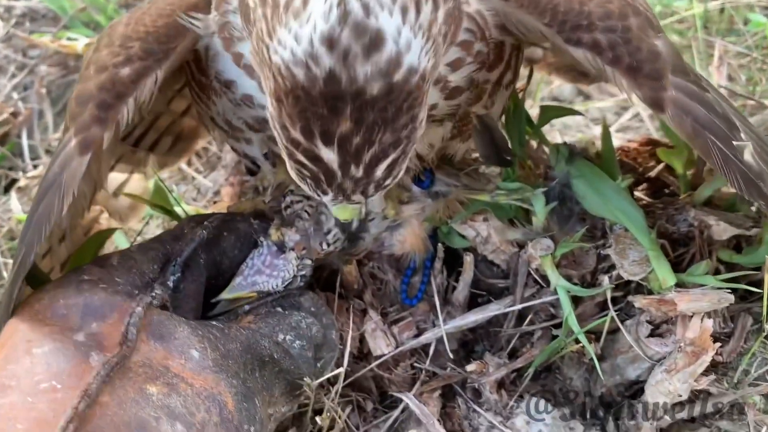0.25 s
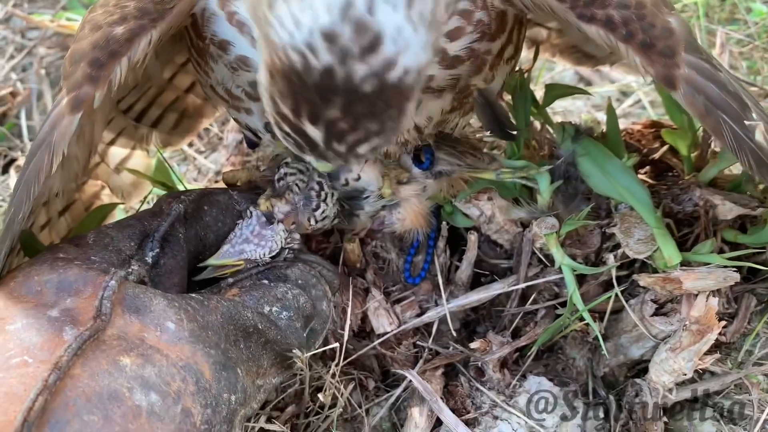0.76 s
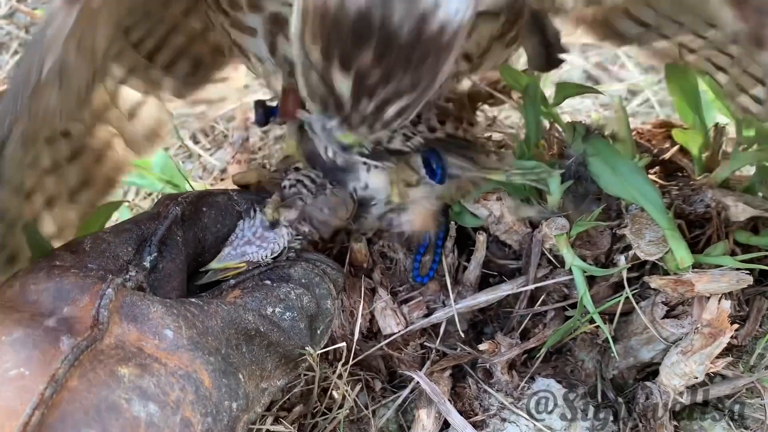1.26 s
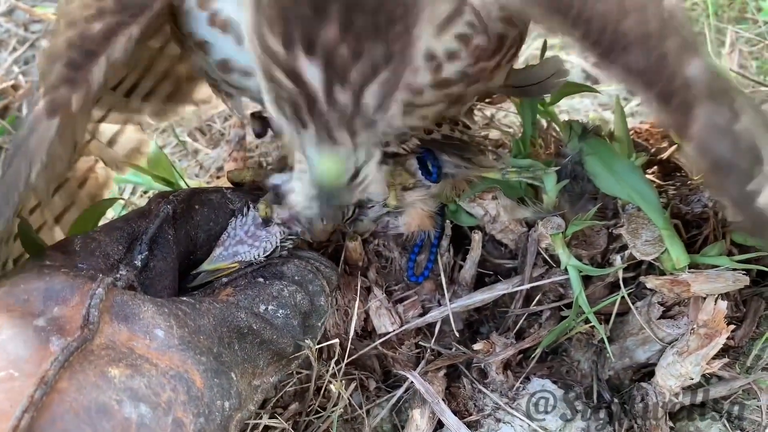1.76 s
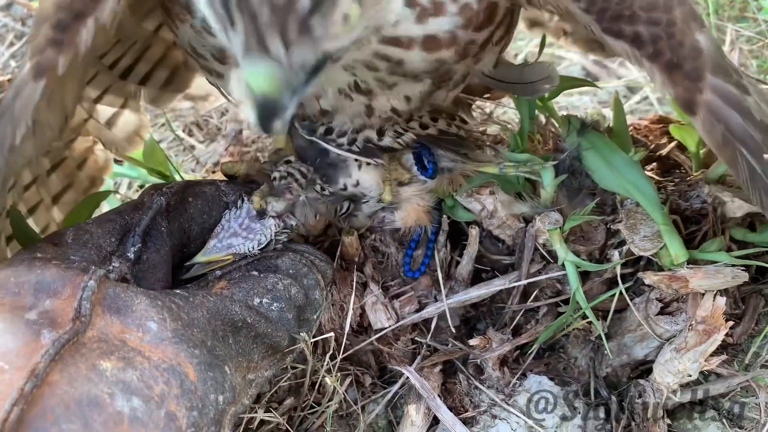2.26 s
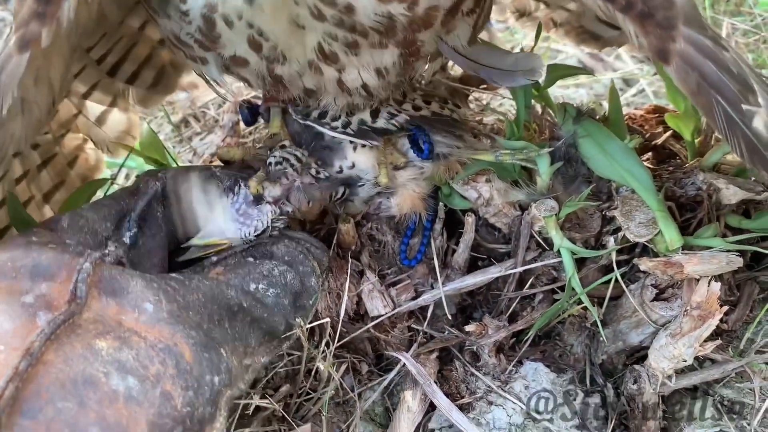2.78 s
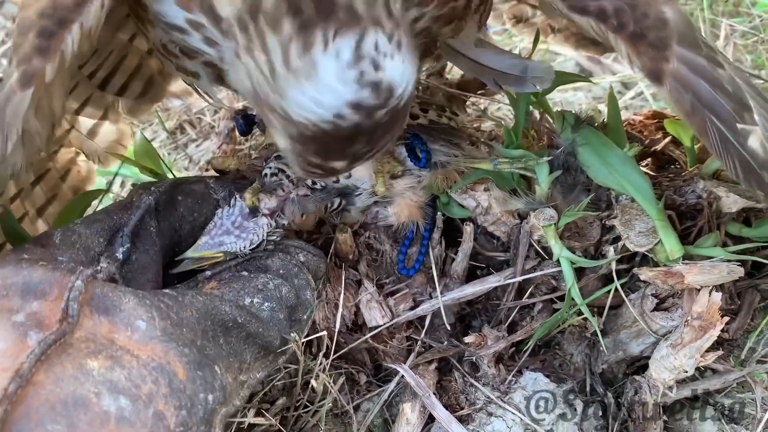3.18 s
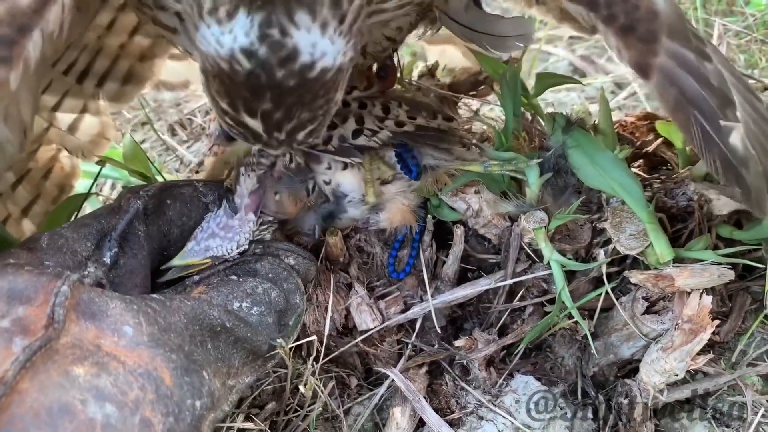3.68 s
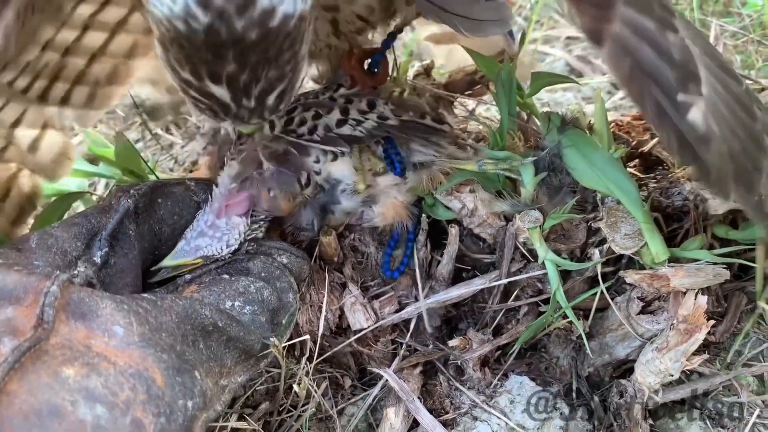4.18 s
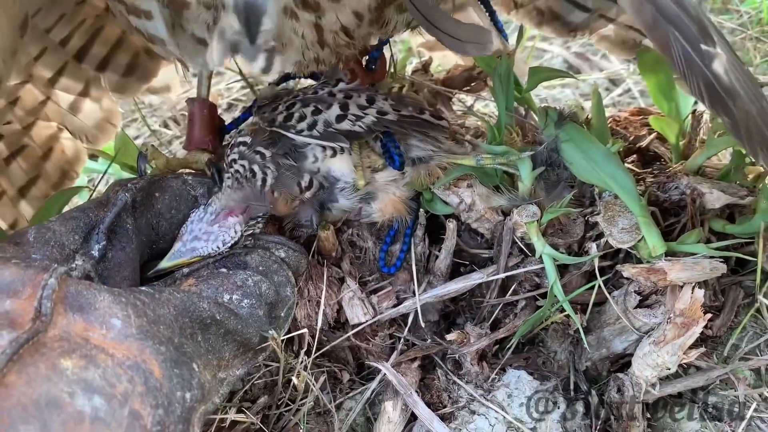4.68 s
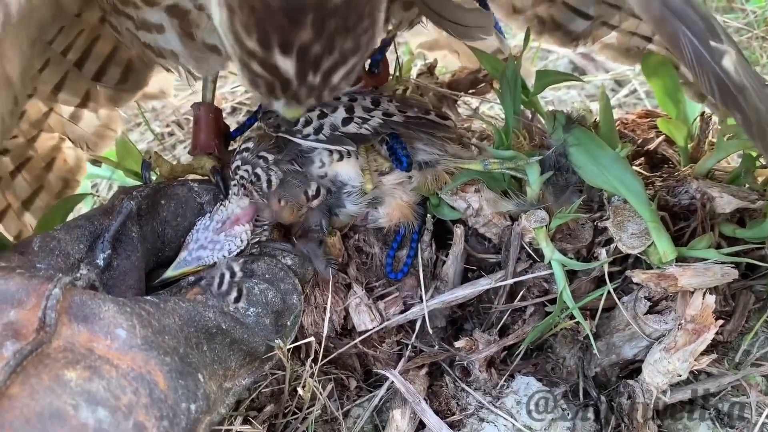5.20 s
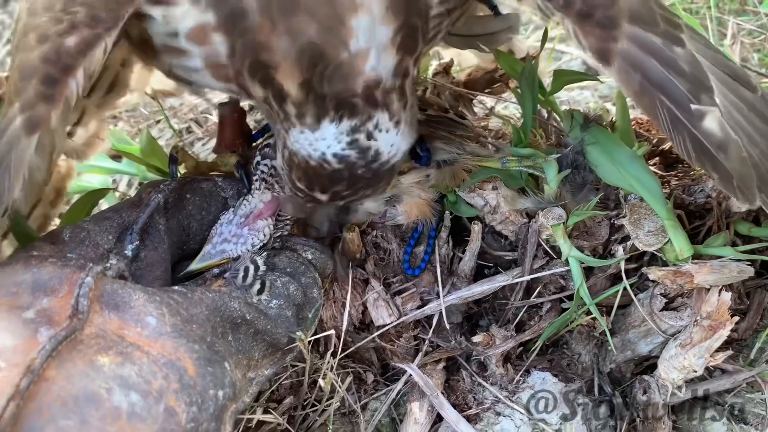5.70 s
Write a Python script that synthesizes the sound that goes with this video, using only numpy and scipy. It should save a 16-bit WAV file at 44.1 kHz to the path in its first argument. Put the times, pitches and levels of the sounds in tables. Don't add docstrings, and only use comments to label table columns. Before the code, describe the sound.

Outdoors among trees, a phone held an arm's length from a feeding hawk hears a low, steady rumble of far traffic with light air hiss and a very high insect shimmer that thins out mid-way. From 0 to 1.4 s there are faint twig snaps, dry leaf ticks and brushing swishes, with a sharper snap and small dull thud at 0.6 s. Tiny far songbird whistles appear at the start and around 2 to 2.8 s. Hollow little beak-on-bone knocks cluster from 2.5 to 3.4 s. Brisk cracks and leaf drags stand out at 3.9 to 4.3 s, then it nearly stills, a faint high katydid pulsing rapidly. At 5.0 s comes one loud, piercing call, about a quarter second long, leaping up then sliding down, slightly rough at its end, with a thin answer from the trunks. Traffic swells slightly and faint rustles return near 5.7 s.

```python
import sys
import numpy as np
from scipy import signal
from scipy.fft import rfft, irfft
from scipy.io import wavfile
from scipy.ndimage import uniform_filter1d

SR = 44100
rng = np.random.default_rng(int(sys.argv[2]) if len(sys.argv) > 2 else 0)


def ratio_of_db(decibels):
    return 10 ** (np.asarray(decibels, float) / 20)


def persist_wave(psi):
    counts = np.round(np.clip(psi, -1, 1) * 32767).astype(np.int16)
    wavfile.write(sys.argv[1], SR, np.atleast_2d(counts).T)


N = 262262
TIME = np.arange(N) / SR
HZ = np.arange(N // 2 + 1) * SR / N + 1e-6


def curves(rows, smooth=1):
    s, *columns = np.transpose(rows)
    lines = [np.interp(TIME, s, column) for column in columns]
    return [uniform_filter1d(uniform_filter1d(line, smooth), smooth) for line in lines]


def on_log(rows):
    hz, db = np.transpose(rows)
    return np.interp(np.log(HZ), np.log(hz), db)


def level(x, db):
    return x * ratio_of_db(db) / np.sqrt(np.mean(x ** 2))


def band(x, lo_hz, hi_hz):
    return signal.sosfilt(signal.butter(2, [lo_hz, hi_hz], "band", fs=SR, output="sos"), x)


def walk(rate):
    k = int(SR / rate)
    held = np.repeat(rng.standard_normal(N // k + 1), k)
    return 1.4 * uniform_filter1d(uniform_filter1d(held, k), k)[:N]


def bump(x, centre, width, db):
    return db / (1 + (2 * (x - centre) / width) ** 2)


def ports(x, pan_db):
    # frequency in Hz, left port's lead in radians.
    port_lead = [(0, 0.5), (1400, 1.11), (2000, 0.7), (2200, 0.4), (2300, 1.3), (2450, 0.5), (3200, 1.5),
                 (4200, 2.1), (4900, 3.49), (6200, 5.9), (7400, 7.5), (9800, 10.9), (12300, 15),
                 (16000, 20.0)]
    half_lead = np.interp(HZ, *np.transpose(port_lead)) / 2
    power_ratio = ratio_of_db(pan_db) ** 2
    left = np.sqrt(power_ratio) * np.exp(1j * half_lead)
    right = np.exp(-1j * half_lead)
    gains = np.sqrt(2 / (1 + power_ratio)) * np.array([left, right])
    return irfft(rfft(x) * gains, N)


def diffuse(colour):
    # frequency in Hz, side minus mid in dB.
    side_spread = [(60, -24.5), (110, -20.5), (200, -16), (380, -5.5), (700, 3.5), (1290, 2), (2380, 2.5),
                   (4400, 6), (8120, -0.5), (15000, -3)]
    spread = np.array([np.ones_like(HZ), ratio_of_db(on_log(side_spread))])
    noise = irfft(rfft(rng.standard_normal((2, N))) * spread * colour, N)
    return noise / noise[0].std()


def traffic():
    # frequency in Hz, density in dB per Hz.
    rumble_tone = [(15, -53.5), (25, -21), (62, -6), (80, -1), (97, -1.5), (135, -6), (160, -5.5),
                   (259, -23.5), (279, -15.5), (333, -25.5), (409, -42), (441, -41.5), (520, -38.5),
                   (680, -72), (1140, -120)]
    # centre in Hz, width in Hz, level in dB.
    engines = [(62.6, 11, -70.5), (84.8, 6, -76), (122.3, 3.9, -69.5), (148.06, 3.5, -72),
               (242.6, 6, -78.5)]
    # time in seconds, width in seconds, swell in dB.
    cars = [
        (0, 2.4, 9.5),
        (4.1, 1.3, 8.5),
        (5.65, 1.1, 12),
    ]
    rumble = diffuse(ratio_of_db(on_log(rumble_tone))) * ratio_of_db(-63 + 0.79 * walk(1.2))
    for hz, width_hz, db in engines:
        rumble[0] += level(band(rng.standard_normal(N), hz - width_hz / 2, hz + width_hz / 2), db)
    road = band(band(rng.standard_normal(N), 330, 470), 330, 470)
    road_db = -100 + sum(bump(TIME, *car) for car in cars) + 2.5 * walk(6)
    rumble[0] += ratio_of_db(road_db) * level(road, 0)
    return rumble


def air():
    # frequency in Hz, density in dB per Hz.
    air_tone = [(290, -31), (500, -8), (680, -26), (753, -15.5), (1130, -32), (1370, -16), (1520, -32),
                (2160, -20), (3500, -33), (7600, -23), (8660, -29.5), (10000, -16.5), (16500, -36)]
    return diffuse(ratio_of_db(on_log(air_tone))) * ratio_of_db(-93.5 + 1.8 * walk(4))


def insect_chorus():
    # time in seconds, level in dB.
    chorus_swell = [
        (0, -91.5),
        (3.6, -103.5),
        (5.95, -96),
    ]
    colour = np.exp(-((HZ - 11500) / 600) ** 2)
    return diffuse(colour) * ratio_of_db(curves(chorus_swell)[0] + 1.68 * walk(45))


def ambience():
    mid, side = traffic() + air() + insect_chorus()
    return np.array([(mid + side) * ratio_of_db(0.47), (mid - side) * ratio_of_db(-0.42)])


def songbirds():
    hook = [(0, .87), (.35, 1), (.6, .93), (1, 0.57)]
    flick = [(0, .86), (.15, 1), (.3, .8), (.42, .82), (.65, .77), (1, .88)]
    slide = [(0, 0.98), (1, .93)]
    leap = [(0, .74), (.27, .81), (.42, 1), (.62, .73), (.76, 0.57), (1, .61)]
    # start in seconds, length in seconds, top pitch in Hz, peak in dB.
    hooks = [
        (2.01, .06, 2350, -93.5),
        (2.146, .04, 2420, -88.5),
        (2.7, 0.063, 2460, -87),
        (0.35, .075, 3350, -92),
    ]
    flicks = [
        (2.205, .085, 3650, -94),
        (2.62, .075, 3700, -90),
    ]
    slides = [
        (.075, .025, 8000, -82),
        (.388, .03, 2620, -90),
        (2.32, .025, 3200, -99),
        (1.906, .008, 3250, -85),
    ]
    leaps = [
        (2.688, .078, 4250, -88),
    ]
    out = np.zeros(N)
    for shape, notes in ((hook, hooks), (flick, flicks), (slide, slides), (leap, leaps)):
        for s, length, top_hz, db in notes:
            hz, = curves([(s + part * length, pitch * top_hz) for part, pitch in shape], smooth=150)
            swell = np.sin(np.pi * np.clip((TIME - s) / length, 0, 1)) ** 0.32
            out += ratio_of_db(db + 3.7 * walk(120)) * swell * np.sin(2 * np.pi * np.cumsum(hz) / SR)
    foliage = rng.standard_normal(2500) * np.exp(-np.arange(2500) / 500)
    smeared = signal.fftconvolve(out, foliage / np.linalg.norm(foliage))[:N]
    return .6 * out + 1.1 * smeared


def katydid():
    stroke_every_s, stroke_end_s, tooth_hz = .1103, 5.526, 131
    left_s = (stroke_end_s - TIME) % stroke_every_s
    tooth = np.sin(np.pi * left_s * tooth_hz) ** 4
    stroke = ratio_of_db(-160 * np.maximum(left_s - .035, 0)) * (left_s < 9 / tooth_hz)
    warming_db = -24 * np.exp(np.minimum(3.5 - TIME, 1) / .6)
    stopping_db = -90 * np.maximum(TIME - 5.76, 0)
    wing = np.sin(2 * np.pi * np.cumsum(10120 + 25 * walk(130)) / SR)
    return np.sqrt(2) * ratio_of_db(-78 + warming_db + stopping_db) * stroke * tooth * wing


def rustle():
    # time in seconds, level in dB.
    stir = [
        (0, -90),
        (.55, -85),
        (.7, -102),
        (2.5, -100.5),
        (4.4, -110),
        (5.95, -110),
    ]
    # start in seconds, length in seconds, level in dB,
    # dryness in dB per band.
    swishes = [(0.096, 0.11, -90, -8.5), (0.235, 0.12, -81, -7.5), (0.445, 0.094, -96, -6),
               (0.558, 0.083, -81, -3.5), (0.823, 0.11, -96, -7.5), (0.947, 0.19, -94, 2),
               (1.17, 0.13, -79.5, 2.8), (1.27, 0.13, -92.5, -0.5), (1.557, 0.09, -93.5, 8.5),
               (1.764, 0.07, -90, -3.7), (2.3, 0.1, -95.5, -5), (2.524, 0.043, -92.5, -7.4),
               (2.75, 0.18, -97, -5.5), (2.926, 0.064, -94, -7), (3.066, 0.12, -95.5, -6.5),
               (3.418, 0.12, -92, -6.7), (3.855, 0.056, -88, -1), (3.891, 0.16, -78, 2.2),
               (4.197, 0.16, -81, 0.5), (5.678, 0.061, -95, -4), (5.761, 0.098, -91.5, 0)]
    leaf_bands_db = [0.16, 0.71, 0.1, -0.8]
    below_db, = curves(stir)
    above_db = -102 + .3 * (below_db + 102)
    sizes = ratio_of_db([below_db - 2.0, below_db, above_db, above_db - 8.0])
    for s, length, db, dry_db in swishes:
        part = np.clip((TIME - s) / length, 0, 1)
        swell = np.sin(np.pi * part ** 0.62) ** 1.07
        sizes = sizes + np.outer(ratio_of_db(db + dry_db * (np.arange(4) - 3 / 2) + leaf_bands_db), swell)
    grains = (rng.random(N) < 350 / SR) * ratio_of_db(np.minimum(5.1 * rng.exponential(size=N), 11.0))
    crackle = .45 + level(signal.lfilter([1], [1, -.975], grains), -3)
    low, middle, high, top = sizes
    layers = [(400, 1300, low), (1300, 3800, middle), (4500, 9500, high),
              (9500, 12500, .6 * np.sqrt(high * top)), (13800, 15300, top)]
    out = np.zeros(N)
    for lo_hz, hi_hz, size in layers:
        out += size * ratio_of_db(2.0 * walk(23)) * level(band(rng.standard_normal(N), lo_hz, hi_hz), -2.0)
    return crackle * out


def ticks():
    # start in seconds, knock in dB, pitch in Hz, crispness in dB.
    knocks = [(0.167, -63.5, 640, -8), (0.244, -78, 767, -13), (0.465, -73, 490, -4),
              (0.516, -65, 704, -30), (0.861, -67.5, 713, -14), (0.988, -67.5, 730, -4),
              (1.23, -65.5, 690, 0.5), (1.379, -60.5, 570, -13.5), (2.138, -70, 695, -7),
              (2.377, -76, 485, -16), (2.533, -62.5, 500, -16), (2.608, -74.5, 522, -9),
              (2.653, -63.5, 735, -7), (2.778, -52, 740, -12), (2.837, -58.5, 659, -12),
              (2.865, -78, 684, -12), (2.943, -58.5, 725, -22), (3.072, -58, 740, -8.5),
              (3.116, -66, 770, -12), (3.186, -60.5, 764, -30), (3.257, -65.5, 766, -28),
              (3.421, -69, 700, -19), (3.996, -50, 680, -3), (4.953, -72, 1200, -9)]
    # start in seconds, snap in dB, crispness in dB.
    twig_snaps = [(0.044, -71, 1), (0.071, -67.5, -4), (0.109, -59, -5.5), (0.121, -60.5, -14),
                  (0.226, -67, -16), (0.282, -56, -3.5), (0.556, -64, -12), (0.571, -63, -3),
                  (0.588, -50.5, 5.5), (0.85, -68.5, -18), (0.952, -62.5, -20), (1.06, -68, 0),
                  (1.78, -68.5, -0.5), (1.909, -67, -28), (2.307, -72, -19), (2.339, -76, -7),
                  (2.841, -67, -19), (2.965, -78, -13), (3.284, -75, -11), (3.435, -64.5, -3.5),
                  (3.47, -71.5, -1), (3.565, -67, -15), (3.935, -57.5, -1), (3.948, -46, -13),
                  (3.965, -46, -4), (4.241, -47, -4), (4.25, -42.5, -5.5), (4.255, -52.5, -13.5),
                  (5.703, -67, -3.5), (5.939, -76.5, -4)]
    # start in seconds, tick in dB.
    leaf_ticks = [(0.025, -65), (0.318, -66), (0.564, -67), (0.612, -67), (1.021, -67.5), (1.043, -73),
                  (1.324, -76), (1.4, -71.5), (1.597, -70), (3.779, -71), (3.886, -63.5), (4.217, -54),
                  (4.224, -53), (5.774, -61.5), (5.811, -69)]
    # start s, knock dB, knock Hz, snap dB, tick dB; a bone's snap follows its crispness
    hits = [(s, db, hz, db + 0.5 + .35 * crisp_db, db + crisp_db) for s, db, hz, crisp_db in knocks]
    hits += [(s, db - 10.5, 623, db, db + crisp_db) for s, db, crisp_db in twig_snaps]
    hits += [(s, db - 14.5, 560, db - 7.5, db) for s, db in leaf_ticks]
    out = np.zeros(N + 4096)
    t = np.arange(2048) / SR
    burst = (1 - np.exp(-t / 0.0015)) * (2.61 * np.exp(-t / 0.001) + 0.059 * np.exp(-t / 0.012))
    late = np.maximum(t - .002, 0)
    for s, knock_db, hz, snap_db, tick_db in hits:
        knock = np.sin(2 * np.pi * hz * late) * np.exp(-late * hz / 1.28) * 1.77
        snap = level(band(rng.standard_normal(2048), 1350, 3800), 1.6) * burst
        tick = level(band(rng.standard_normal(2048), 5000, 13500), 3.47) * burst
        i = int(s * SR) - 40
        out[i:i + 2048] += ratio_of_db(knock_db) * knock + ratio_of_db(snap_db) * snap + ratio_of_db(tick_db) * tick
    return out[:N]


def thud():
    body_drop = (.5912, -39.5, 205, 300)
    s, db, hz, more_hz = body_drop
    t = np.maximum(TIME - s, 0)
    turns = hz * t + more_hz * .003 * (1 - np.exp(-t / 0.0024))
    return ratio_of_db(db) * 2 * np.sin(2 * np.pi * turns) * np.exp(-t / 0.0027) * np.minimum(t / 0.0012, 1)


def trunks(voice):
    t60_s, stand_s = .7, .13
    t = TIME[:SR // 3]
    stand = 1 + 4 * np.exp(-((t - stand_s) / .03) ** 2)
    shape = np.minimum(t / .07, 1) ** 2 * ratio_of_db(-60 * t / t60_s) * stand
    answer = shape * rng.standard_normal(len(t))
    bright = band(band(voice, 3200, 6800), 5000, 7000)
    return ratio_of_db(-51) * signal.fftconvolve(bright, answer / np.linalg.norm(answer))[:N]


def hawk():
    # time in seconds, pitch in Hz, effort in dB, brightness in dB per octave.
    call = [
        (4.987, 1414, -69, -2),
        (4.997, 2276, -28, -0.35),
        (5.014, 2455, -22.5, 1.1),
        (5.034, 2463, -28, 1.53),
        (5.073, 2284, -29, -2),
        (5.117, 2213, -37, 3),
        (5.179, 2016, -37, 0),
        (5.208, 1555, -48.5, -3.5),
        (5.226, 1210, -81, -33),
    ]
    # centre in Hz, width in Hz, peak or dip in dB.
    tract = [(2373, 470, -23.5), (2350.0, 150, 12.5), (3997, 2340, 16.5), (4260, 220, 2), (4650, 170, -12),
             (4960, 220, -6.5), (6600, 39, -7.5), (7318, 280.0, 8), (8250, 210, 4.5), (9180, 80.0, -5),
             (9850, 2270.0, 6), (10870, 170, -14), (11180, 160, 6), (11420, 90.0, -10), (12080, 240.0, -9),
             (13470, 2370, -23.5), (15040, 210, 10.5), (15230, 1200, -17.5), (16180, 230.0, -27)]
    hz, effort_db, tilt_db = curves(call, smooth=265)
    breath_db = np.clip(-48 + (2130 - hz) / 13, -48, -23)
    half_db = -48 - 150 * np.maximum(5.06 - TIME, 0) - 700 * np.maximum(TIME - 5.135, 0)
    on = (TIME > call[0][0] - .008) & (TIME < call[-1][0] + .008)
    hz, effort_db, tilt_db, breath_db, half_db = [x[on] for x in (hz, effort_db, tilt_db, breath_db, half_db)]
    fade = signal.windows.tukey(on.sum(), .12)
    phase = 2 * np.pi * np.cumsum(hz) / SR
    detune_hz = 90 + 4200 * np.clip(5.085 - TIME[on], 0, .065) + 60 * walk(220)[on]
    drift = 2 * np.pi * np.cumsum(detune_hz) / SR
    voice = np.zeros(N)
    for k in (.5, 1, 1.5, 2, 3, 3.5, 4, 5, 6, 7):
        db = effort_db + tilt_db * np.log2(max(k, 1)) + sum(bump(k * hz, *mode) for mode in tract)
        db = db - np.maximum(k * hz - 15800, 0) / 10
        turn = k * phase + 2 * np.pi * rng.random()
        if k % 1:
            size = ratio_of_db(half_db) * min(k + .2, 1) * (.6 + .8 * walk(350)[on])
            shift = np.sign(k - 1) * drift
            line = np.sin(turn + shift) + 0.43 * np.sin(turn - shift)
        else:
            size = 1 + ratio_of_db(breath_db) * walk(900)[on]
            line = np.sin(turn)
        voice[on] += np.sqrt(2) * ratio_of_db(db) * size * fade * line
    return voice


def scene():
    # frequency in Hz, left minus right in dB.
    litter_pan = [(60, 3.5), (110, 1.5), (200, 1.5), (380, 0), (700, 1.5), (1290, -2), (2380, -3.5),
                  (4400, 2), (8120, 1), (15000, -0.5)]
    # centre in Hz, width in Hz, dip in dB.
    hand_shade = (2320, 180, -16)
    far = np.outer([1, .8], songbirds()) + np.outer([1, .7], katydid())
    litter = ports(rustle() + ticks() + thud(), on_log(litter_pan))
    voice = hawk()
    bird = ports(voice, bump(HZ, *hand_shade)) + ports(trunks(voice), np.zeros_like(HZ))
    return ambience() + far + litter + bird


def roll_off(x):
    return signal.sosfilt(signal.butter(12, 16640, fs=SR, output="sos"), x)


def record(dry):
    cut = signal.sosfilt(signal.butter(3, 36, "high", fs=SR, output="sos"), dry)
    cut = signal.sosfilt(signal.ellip(8, .2, 70, 16000, fs=SR, output="sos"), cut)
    return roll_off(cut)


dry = scene()
out = record(dry)
persist_wave(out)
```